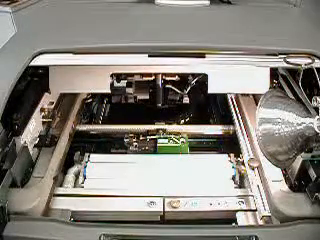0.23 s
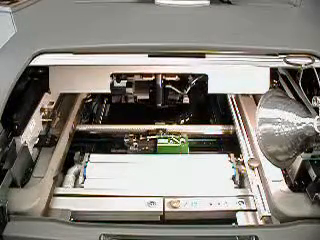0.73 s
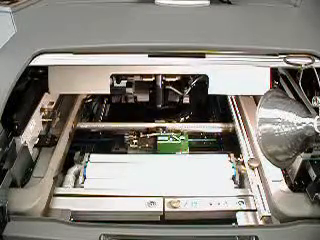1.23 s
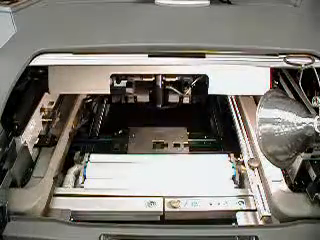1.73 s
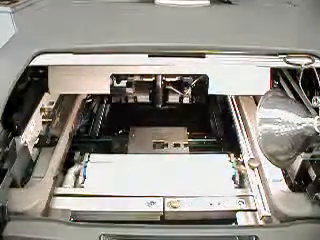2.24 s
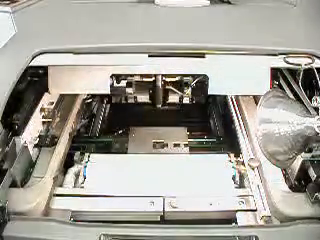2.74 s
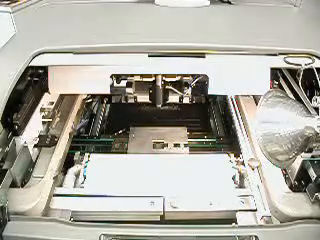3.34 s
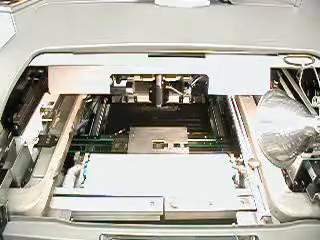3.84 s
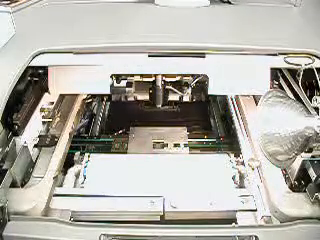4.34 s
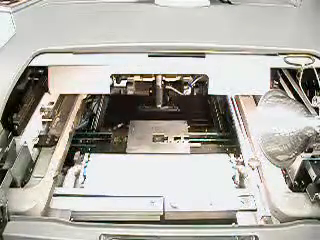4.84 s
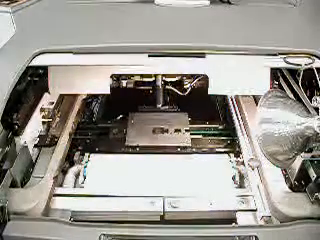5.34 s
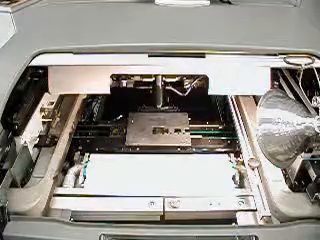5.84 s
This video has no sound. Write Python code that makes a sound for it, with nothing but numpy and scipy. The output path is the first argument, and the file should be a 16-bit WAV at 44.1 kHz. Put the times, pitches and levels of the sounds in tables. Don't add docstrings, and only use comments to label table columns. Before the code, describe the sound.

Cabinet fans hum while loose parts knock, suction air bursts on, a motor whines up and down, then a hard metallic clack and throbbing drive whine.

```python
import sys
import numpy as np
from scipy import signal
from scipy.io import wavfile
from scipy.ndimage import uniform_filter1d

SR = 44100
rng = np.random.default_rng(int(sys.argv[2]) if len(sys.argv) > 2 else 0)


def ratio_of_db(decibels):
    return 10 ** (np.asarray(decibels, float) / 20)


def to_wav(s):
    ch = np.atleast_2d(s).T
    pcm = np.round(np.clip(ch, -1, 1) * 32767)
    wavfile.write(sys.argv[1], SR, pcm.astype(np.int16))


N = 268559
HOLD_HZ = 8000.8


def rms1(x):
    return x / np.sqrt(np.mean(x ** 2) + 1e-20)


def read(points, hz):
    f, value = np.transpose(points)
    return np.interp(np.log(hz + 1), np.log(f + 1), value)


def curves(rows):
    s, *columns = np.transpose(rows)
    t = np.arange(N) / SR
    gate = np.clip(np.minimum(t - s[0], s[-1] - t) / 0.0013, 0, 1)
    return [np.interp(t, s, c) for c in columns], gate


def resonate(x, hz, width):
    turn = np.exp(2j * np.pi * np.cumsum(hz * np.ones(len(x))) / SR)
    r = np.exp(-np.pi * width / SR)
    return 2 * (turn * signal.lfilter([1 - r], [1, -r], x / turn)).real


def fuzzy_tone(hz, width, clean):
    sine = np.sqrt(2) * np.sin(2 * np.pi * np.cumsum(hz * np.ones(N)) / SR)
    fuzz = resonate(rng.standard_normal(N), hz, width)
    fuzz = rms1(resonate(fuzz, hz, 3 * width))
    return clean * sine + np.sqrt(1 - min(clean, 1) ** 2) * fuzz


def noise(spectrum, peaks, patchy_db, ref_hz):
    hz = np.fft.rfftfreq(2048, 1 / SR)
    a, b, patches = rng.standard_normal((N // 512 + 5, 1025, 3)).T
    patches = uniform_filter1d(patches, 12, 0)
    patches = rms1(uniform_filter1d(patches, 6, 1))
    bumps_db = sum(db / (1 + (2 * (hz - f) / w) ** 2) for f, w, db in peaks)
    shape_db = read(spectrum, hz) + bumps_db
    heard = (hz < HOLD_HZ / 2)[:, None]
    z = (a + 1j * b) * ratio_of_db(shape_db[:, None] + patchy_db * patches) * heard
    x = rms1(signal.istft(z, nperseg=2048, noverlap=1536)[1][:N])
    band = (hz > ref_hz[0]) & (hz < ref_hz[1])
    return x * np.sqrt(np.sum(abs(z) ** 2) / np.sum(abs(z[band]) ** 2))


# pitch_hz, level_db (per Hz)
FAN_WASH = [(20, -24), (40, -10.5), (200, -11.5), (300, -1.5), (500, 3), (700, 2), (1200, -3.5), (1700, -3),
            (2200, -7), (2600, -8.5), (3990, -14)]
# pitch_hz, width_hz, level_db
BLADES = [
    (318, 14, -40),
    (625.5, 14, 0),
]
# time_s, level_db
BLADE_SWELL = [(0, -40), (.22, -25.5), (.34, -36), (.5, -26.5), (.68, -46), (.92, -27.5), (1.05, -39),
               (1.9, -27.5), (2.099, -49), (2.24, -25), (2.85, -45.5), (3.1, -29), (3.45, -28), (3.62, -33),
               (4.55, -31), (5.28, -26), (5.4, -37.5), (6.09, -28.5)]


def fans():
    swell_db = np.interp(np.arange(N) / SR, *np.transpose(BLADE_SWELL))
    low, high = (ratio_of_db(db) * fuzzy_tone(f, w, clean=.85) for f, w, db in BLADES)
    wash = ratio_of_db(-33.5) * noise(FAN_WASH, [], 1.17, (800, 3900))
    return wash + low + ratio_of_db(swell_db) * high


# start_s, peak_db, ring_factor (times the usual ring), brightness_db (per octave)
KNOCKS = [(.063, -23, 1, 11), (.266, -24, 0.45, 7), (.2705, -15, 0.37, 6), (.286, -16, 0.58, 6),
          (0.339, -15, 0.47, 8), (.398, -12.5, 0.41, -9.5), (4.235, -15, 0.3, 9), (5.677, -16, 1.1, 1),
          (5.699, -22, .7, 5), (5.729, -17, 1.1, 1), (4.2908, -8, 0.53, -4), (4.2950, 7, 0.63, 0.5),
          (4.303, 3, 1.35, -1), (4.312, 1.5, 0.87, 0), (4.330, -3.5, 1.35, 0.5), (1.45, -11, .8, 4)]
# pitch_hz, level_db, ring_s (time to fall 60 dB)
PLATE = [(791, -8, .4), (1017, -5, .4), (1150, -10, .3), (1400, -4, .1), (1620, -2, .2), (1733, 0, .12),
         (1852, -8, .2), (2067, 0, .14)]
# pitch_hz, level_db (per Hz)
RATTLE = [(40, -18), (300, -16), (550, 1.5), (850, -7), (1000, -5), (1300, -7), (1800, -2), (2150, -1),
          (2450, -11), (3990, -19.5)]
# pitch_hz, ring_s (time to fall 60 dB)
RATTLE_RING = [(60, 0.37), (400, 0.55), (1000, 0.51), (2000, 0.14), (4000, 0.21)]


def knocks():
    out, t = np.zeros(N + SR), np.arange(SR // 2) / SR
    for s, peak_db, ring, tilt_db in KNOCKS:
        tilt_db = np.clip(tilt_db, -6, 8)
        hz, frames, z = signal.stft(rng.standard_normal(len(t)), SR, nperseg=256)
        colour_db = read(RATTLE, hz) + tilt_db * np.log2(hz / 1000 + 0.03)
        fade_db = 60 * frames / (ring * read(RATTLE_RING, hz)[:, None])
        z *= ratio_of_db(colour_db[:, None] - fade_db) * (hz < HOLD_HZ / 2)[:, None]
        z *= 1 - np.exp(-(frames + 0.0033) * (hz[:, None] + 50) / 4)
        rattle = signal.istft(z, SR, nperseg=256)[1][:len(t)]
        rattle = signal.lfilter(*signal.butter(2, 280, "high", fs=SR), rattle)
        plate = np.zeros(len(t))
        for (f, db, ring_s), turn in zip(PLATE, rng.random(len(PLATE))):
            tone_db = db + tilt_db * np.log2(f / 1000) - 60 * t / (ring * min(ring_s, .45))
            plate += ratio_of_db(tone_db) * np.sin(2 * np.pi * (f * t + turn))
        blow = rattle / np.std(rattle[:900]) + ratio_of_db(-1) * plate / np.std(plate[:900])
        out[round(s * SR):][:len(t)] += ratio_of_db(peak_db - 14.5) * blow * np.minimum(t / .0012, 1)
    return out[:N]


# pitch_hz, level_db (per Hz)
AIR = [(18, -32), (30, 3), (40, -32), (64, -28.5), (214, -26.5), (309, -15.5), (438, -17.5), (620, -6),
       (826, -19), (896, -11.5), (1240, -14), (2070, -14.5), (3990, -22.5), (5190, -57), (8780, -120)]
# pitch_hz, width_hz, level_db (above the air)
CABINET = [(415, 22, 7.2), (518, 3.8, 11.6), (603, 11, 2.9), (761, 78, 9), (906, 11, 7.2), (1089, 20, 12.5),
           (1515, 21, 10.6), (2028, 23, 9.3), (2136, 15, 10.5), (2775, 124, 2.3), (3120, 240, 2.9)]
# time_s,
# level_db
FLOW = [(0.27, -30), (0.297, -30), (0.315, -33), (0.334, -40), (0.341, -33), (4.12, -32.5), (4.24, -28.5),
        (4.27, -33.5), (4.5, -35.5), (5.15, -35), (5.4, -68)]


def air():
    (flow_db,), gate = curves(FLOW)
    return gate * ratio_of_db(flow_db) * noise(AIR, CABINET, 0.99, (2200, 3600))


# start_s, length_s, level_db
PUFFS = [
    (.27, .03, -29),
    (4.2, .055, -32),
]


def puffs():
    pitch_hz, width_hz = 2900, 1400
    t = np.arange(N) / SR
    level = np.zeros(N)
    for s, length, db in PUFFS:
        level += ratio_of_db(db) * np.clip(np.minimum((t - s) / .002, (s + length - t) / .008), 0, 1)
    hiss = resonate(rng.standard_normal(N), pitch_hz, width_hz)
    return level * rms1(resonate(hiss, pitch_hz, width_hz))


# start_s, pitch_hz, level_db
THUDS = [
    (.396, 330, -21),
    (4.298, 120, -30),
    (4.315, 400, -21),
]


def thud():
    out, ring_s = np.zeros(N), .2
    for s, hz, db in THUDS:
        t = np.maximum(np.arange(N) / SR - s, 0)
        out += ratio_of_db(db - 60 * t / ring_s) * np.sin(2 * np.pi * hz * t)
    return out


# time_s, pitch_hz
SPEED = [
    (1.25, 487.5),
    (1.375, 600),
    (1.44, 748.6),
    (1.47, 869.6),
    (1.515, 1030),
    (1.585, 990),
    (1.65, 763),
    (1.8, 559),
    (1.95, 490),
]
# pitch_hz, level_db (per Hz)
RUSH = [(30, -18), (200, -10.5), (400, -1.5), (800, 1.5), (1200, -6), (1600, 2), (2100, -3.5), (2500, -9),
        (3990, -12)]
# pitch_hz, width_hz, level_db (above the rush)
RAIL = [(424, 24, 8.5), (514, 30, 5.5), (1550, 100, 2.5), (3030, 140, 3.5)]
# pitch_hz, width_hz, motor_hz, reach_hz, level_db
SINGING = [(728, 44, 762, 60, -24), (1730, 46, 827, 63, -19)]
FULL_HZ, BRAKE_S, BRAKING_DB = 1030, 1.61, -2
MOTOR_DB, SECOND_DB, RUSH_DB = (-17.5, 12), (-31, 2), (-29.5, 8)


def gantry():
    (hz,), gate = curves(SPEED)
    effort_db = BRAKING_DB * np.clip((np.arange(N) / SR - BRAKE_S) / 0.029, 0, 1)
    octaves = np.log2(hz / FULL_HZ)
    tone_db, second_db, rush_db = (db + slope * octaves for db, slope in (MOTOR_DB, SECOND_DB, RUSH_DB))
    motor = ratio_of_db(tone_db) * fuzzy_tone(hz, 100, clean=.7)
    motor += ratio_of_db(second_db) * fuzzy_tone(2 * hz, 80, clean=.55)
    for f, width, speed_hz, reach, db in SINGING:
        nearness = 1 / (1 + ((hz - speed_hz) / reach) ** 2)
        motor += ratio_of_db(db) * nearness * fuzzy_tone(f, width, clean=.8)
    rush = noise(RUSH, RAIL, 1.8, (2200, 3600))
    return gate * (ratio_of_db(effort_db) * motor + ratio_of_db(rush_db) * rush)


# pitch_hz, width_hz, level_db
WHISTLE = [
    (736, 25, -26),
    (778, 35, -30),
    (2535, 50, -38.5),
]
BELT_START_S, BELT_RISE_S, BELT_STOP_S, BELT_FALL_S = 4.13, 0.047, 5.14, .14
RUNUP_DB, RUNUP_S, OFF_DB = -4, .6, -30
THROB_HZ, THROB_DEPTH, THROB_PEAK_S = 18.2, .4, 4.935


def belt():
    t = np.arange(N) / SR
    rise, fall = (t - BELT_START_S) / BELT_RISE_S, 1 - (t - BELT_STOP_S) / BELT_FALL_S
    on = np.clip(np.minimum(rise, fall), 0, 1)
    load_db = RUNUP_DB * np.clip(1 - (t - BELT_START_S) / RUNUP_S, 0, 1)
    throb = 1 + THROB_DEPTH * np.cos(2 * np.pi * THROB_HZ * (t - THROB_PEAK_S))
    low, high, thin = (ratio_of_db(db) * fuzzy_tone(f, w, clean=.78) for f, w, db in WHISTLE)
    return (on > 0) * ratio_of_db(OFF_DB * (1 - on)) * (ratio_of_db(load_db) * throb * (low + high) + thin)


def scene():
    mix = fans() + knocks() + air() + puffs() + thud() + gantry() + belt()
    return np.tile(mix, (2, 1))


def hold(x):
    ticks = np.arange(0, N / SR + .01, 1 / HOLD_HZ)
    steps = np.interp(ticks * SR, np.arange(N), x)
    area = np.interp(np.arange(N + 1) / SR, ticks, np.cumsum(steps) / HOLD_HZ)
    return np.diff(area) * SR


FRAME_S = 1152 / 44100
SPIKE_S = 3.58565 + FRAME_S * np.arange(4)
# pitch_hz, mean_db
SCATTER = [(500, 0), (2000, 1.24), (4000, 1.45), (9000, 3), (13000, 2.5)]
ATTACKS_S = [.339, 4.292, *SPIKE_S]
DIP_LEAD_S, DIP_DB, DIP_ABOVE_HZ = .0045, -30, 2500


def short_blocks(x):
    hz, t, z = signal.stft(x, SR, nperseg=256)
    loss = rng.exponential(1, (len(t), 24)).T[(hz // 1000).astype(int)] ** 2 / 2 - 1
    gain_db = np.maximum(-read(SCATTER, hz)[:, None] * loss, -30)
    for s in ATTACKS_S:
        gain_db += DIP_DB * (hz[:, None] > DIP_ABOVE_HZ) * (abs(t - s + DIP_LEAD_S) < .0016)
    return signal.istft(z * ratio_of_db(gain_db), SR, nperseg=256)[1][:N]


SPIKE_DB = [-2.5, -2.5, -1, -2]


def add_spikes(held):
    for s, db in zip(SPIKE_S, SPIKE_DB):
        held[round(s * SR) - 1:][:2] -= ratio_of_db(db)
    return held


TOP = [(-1, 2, -1), (2, 3, 1), (5, 2, 2), (12, 1, 1), (14, 1, 1), (16, 2, 2), (19, 1, 1), (22, 1, -1)]
# first_block, length_blocks, low_hz, high_hz
EMPTY = [(1, 8, 11840, 12260), (10, 12, 11840, 12260), (2, 1, 12000, 12850), (4, 1, 11250, 12000),
         (5, 2, 12000, 12900), (5, 1, 10520, 10900), (6, 1, 11250, 12000), (9, 1, 11150, 11550),
         (14, 1, 11250, 12000), (16, 1, 10550, 13550), (17, 1, 11250, 12850), (19, 1, 4260, 4680)]
# pitch_hz, share (of the band level around them)
ROUNDING = [(500, 0.2), (13000, 0.11)]
BLOCK_S, FIRST_BLOCK_S, BAND_HZ, USUAL_TOP_HZ = 10 * FRAME_S, .11, 700, 13250
NOTCH_HZ, CLACK_OPEN_S = 130, (4.29, 4.325)


def thin_treble(x):
    hz, t, z = signal.stft(x, SR, nperseg=1024)
    block = (t - FIRST_BLOCK_S) // BLOCK_S
    extra = sum(bands * (block >= first) * (block < first + blocks) for first, blocks, bands in TOP)
    keep = hz[:, None] < USUAL_TOP_HZ + BAND_HZ * extra
    for first, blocks, lo_hz, hi_hz in EMPTY:
        in_time = (block >= first) & (block < first + blocks)
        keep[np.ix_((hz > lo_hz) & (hz < hi_hz), in_time)] = False
    no_spikes = (t < SPIKE_S[0] - FRAME_S / 2) | (t > SPIKE_S[-1] + FRAME_S / 2)
    keep[np.ix_(abs(hz - HOLD_HZ) < NOTCH_HZ, no_spikes)] = False
    keep[:, (t > CLACK_OPEN_S[0]) & (t < CLACK_OPEN_S[1])] = True
    band_level = np.sqrt(abs(uniform_filter1d(abs(z) ** 2, size=16, axis=0)))
    keep &= abs(z) > read(ROUNDING, hz)[:, None] * band_level
    return signal.istft(z * keep, SR, nperseg=1024)[1][:N]


# pitch_hz, share
SIDE_SHARE = [(720, 0), (1000, .2), (2500, .4), (3500, .2), (5000, .08), (6500, .15), (8000, .06),
              (11000, .14), (14000, .08)]


def residue(mid):
    hz, t, z = signal.stft(mid, SR, nperseg=1024)
    band = (hz // 700).astype(int)
    block = ((t - .11) // .262 + 1).astype(int)
    tick = (t // .046).astype(int)
    chosen = rng.random((30, 32))[block].T[band] < read(SIDE_SHARE, hz)[:, None]
    flicker = rng.random((140, 32))[tick].T[band] < .6
    scramble = np.exp(2j * np.pi * rng.random(z.shape[::-1]).T)
    return signal.istft(z * chosen * flicker * scramble, SR, nperseg=1024)[1][:N]


def roll_off(x):
    return signal.sosfilt(signal.butter(12, 15510, fs=SR, output="sos"), x)


def record(dry):
    offset = .0447
    stairs = hold(np.clip(dry[0] + offset, -.98, .98)) - offset
    mid = thin_treble(add_spikes(short_blocks(stairs)))
    side = ratio_of_db(-9) * residue(mid)
    mix = np.clip([offset + mid + side, offset + mid - side], -1, 1)
    return roll_off(mix)


dry = scene()
out = record(dry)
to_wav(out)
```